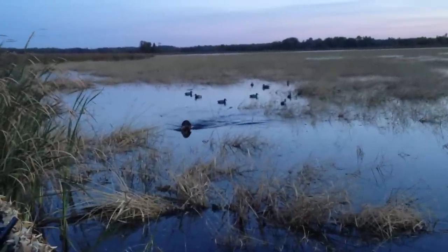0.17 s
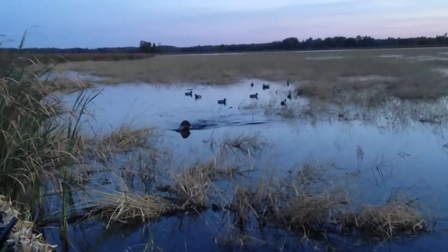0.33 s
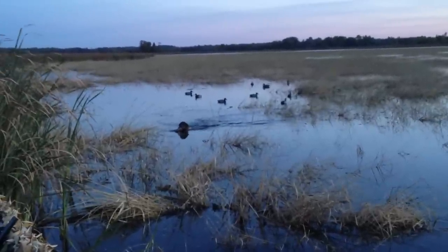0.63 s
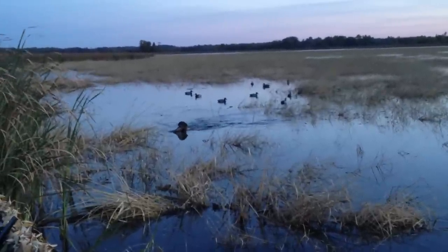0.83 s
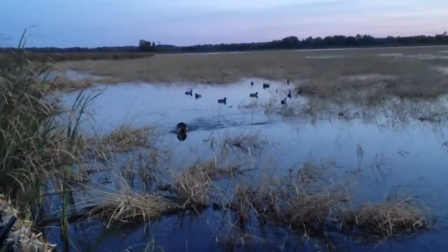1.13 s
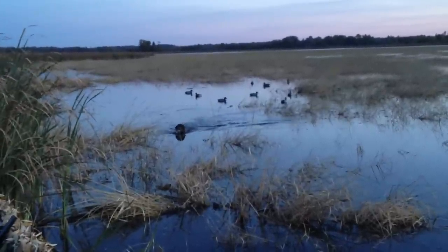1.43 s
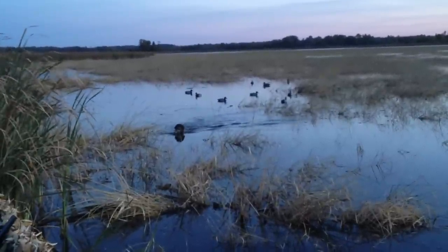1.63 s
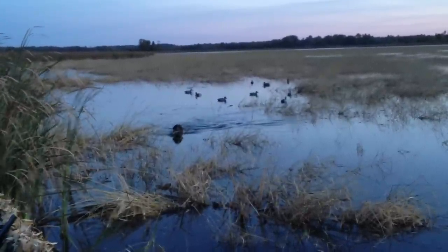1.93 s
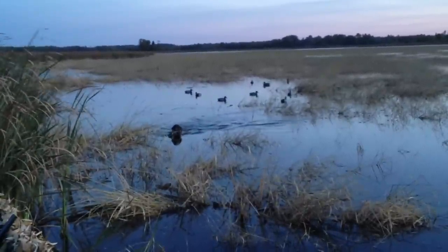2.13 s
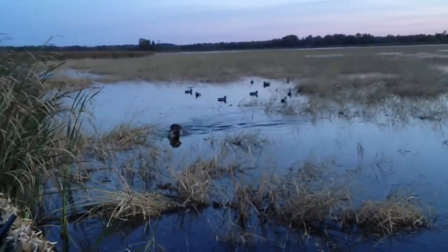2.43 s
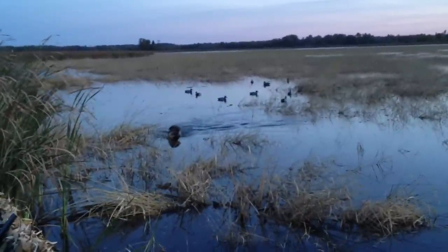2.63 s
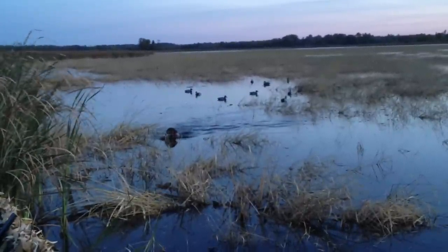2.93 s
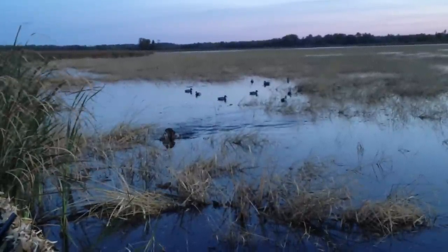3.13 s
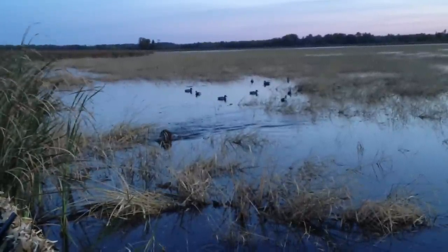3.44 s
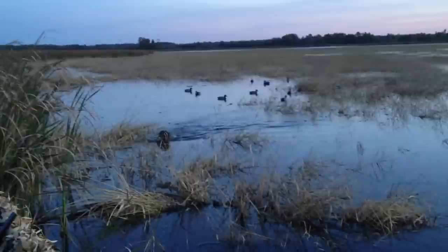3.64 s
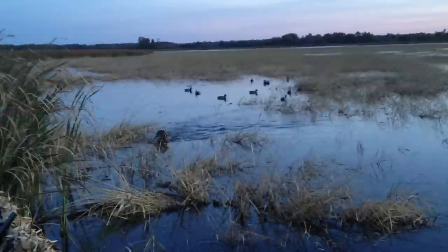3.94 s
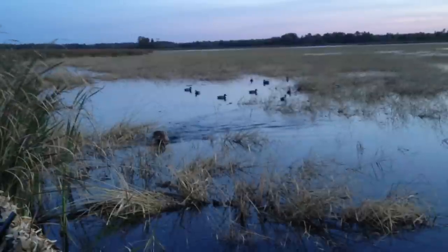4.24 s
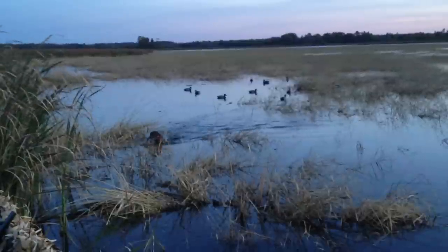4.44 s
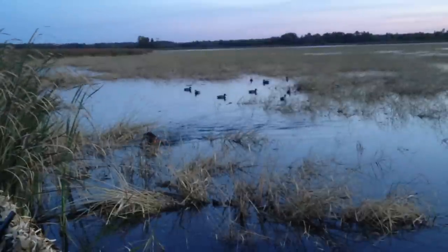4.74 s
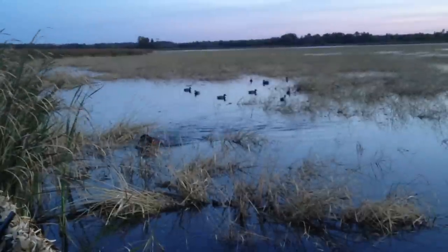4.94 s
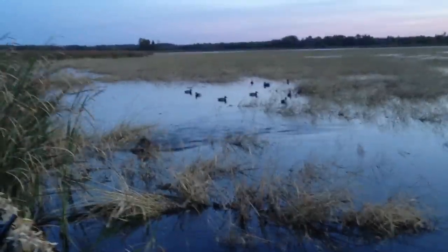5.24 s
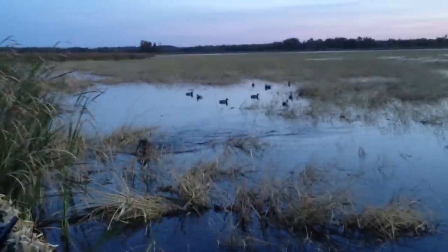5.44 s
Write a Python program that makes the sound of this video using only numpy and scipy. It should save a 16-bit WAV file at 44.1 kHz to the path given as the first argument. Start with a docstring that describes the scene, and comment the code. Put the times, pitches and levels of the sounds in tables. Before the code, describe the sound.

A dog paddles through shallow marsh water with soft, irregular splashes and dry reed snaps, while wind gusts thump on the microphone.

```python
"""Dog paddling through a marsh at dusk

A dog's strokes wash, splash and plop softly in shallow water: fizzing spray and ringing air pockets.
Close by, dry reed stalks snap and hiss; faint, very high pips may be an insect or a distant bird.
Puffs of wind rumble and thump on the microphone, over the faint hiss of the open marsh."""
import sys
import numpy as np
from scipy import signal
from scipy.fft import rfft, irfft
from scipy.io import wavfile
from scipy.ndimage import uniform_filter1d, map_coordinates

SR = 44100
rng = np.random.default_rng(int(sys.argv[2]) if len(sys.argv) > 2 else 0)


def dump(signal):
    """Clip the signal to [-1, 1] and save it as 16-bit WAV at the path in sys.argv[1]."""
    limited = np.clip(np.atleast_2d(signal).T, -1, 1)
    pcm = np.round(limited * 32767).astype(np.int16)
    wavfile.write(sys.argv[1], SR, pcm)


N = 246078
TIME = np.arange(N) / SR


# How hard the dog stirs the water, the fader ride of the wash: (time [s], level [dB])
STIR = [(0.0, -58.5), (0.53, -55), (0.7, -59.5), (0.88, -63), (1.12, -58), (1.26, -55.5), (1.51, -54.5),
        (1.71, -61.5), (1.93, -54.5), (2.11, -53), (2.19, -48.5), (2.35, -56.5), (3.08, -60.5), (3.31, -59),
        (4.4, -59.5), (5.17, -55.5), (5.58, -48.5)]
# EQ of the water's fizz: (frequency [Hz], gain [dB])
WASH_EQ = [(440, -35), (750, -4), (1000, -6), (1140, 0), (1470, -1), (1580, 2), (3260, 0), (3520, 2),
           (5280, -1), (7530, 3.5), (9820, -2), (14200, -1.5), (15500, -9)]

def wash(body_db=-9.5, spray_db=-4.0, drops_db=-12.5, split_hz=4000, body_follows=0.7):
    """Stirred water: a fizzing body with small bubbles, and finer spray that ticks on the stalks."""
    stir_db = np.interp(TIME, *np.transpose(STIR))
    spray_ride = from_db(stir_db)
    body_ride = from_db(stir_db.mean() + body_follows * (stir_db - stir_db.mean()))
    fizz = coloured(rng.standard_normal(N), WASH_EQ)
    low = rms_one(cut(fizz, split_hz, "low")) * from_db(body_db + 1.2 * drift(70))
    high = rms_one(cut(fizz, split_hz, "high")) * from_db(spray_db + .7 * drift(70))
    bubbles, ticks = np.zeros((2, N))
    for when, pitch, softness in rng.random((700, 3)):
        ring = bubble(900 * 6 ** pitch, cycles=10, rise=.015)
        add(bubbles, when * N / SR, from_db(-16 * softness) * ring)
    for when, pitch, softness in rng.random((900, 3)):
        tick = bubble(3000 * 4 ** pitch, cycles=1.5, rise=0)
        add(ticks, when * N / SR, from_db(-18 * softness) * tick)
    body = low + from_db(drops_db) * rms_one(bubbles)
    spray = .22 * rms_one(ticks) - high
    return body_ride * body + spray_ride * spray


def laps(per_s=9, over_stir_db=12.5, spread_db=0.5, centre_hz=3000, octaves=2.6, length_s=0.02):
    """Cues for small random splashes, stronger where the water is stirred more; rows as in SPLASHES."""
    wait, softness, pitch = rng.random((70, 3)).T
    times = np.cumsum(2 * wait) / per_s
    db = np.interp(times, *np.transpose(STIR)) + over_stir_db - spread_db * (2 * softness - 1)
    hz = centre_hz * 2 ** (2 * pitch - 1)
    return [(*cue, octaves, length_s) for cue in zip(times, db, hz)]


# Featured splashes and swishes: (time [s], relative level [dB], centre [Hz], width [octaves], length [s])
SPLASHES = [(0.153, -41, 2230, 2, 0.024), (0.263, -37, 7440, 5.3, 0.027), (0.3114, -33, 5250, 2.2, 0.013),
            (0.658, -32.5, 4300, 1.9, 0.021), (1.078, -41, 5020, 5.5, 0.1), (1.177, -43, 5800, 2.8, 0.059),
            (1.197, -30.5, 3260, 3.2, 0.025), (1.336, -39, 3380, 1.2, 0.049),
            (1.496, -36.5, 3180, 3.2, .075), (1.9626, -39, 1190, 4.2, 0.066),
            (2.009, -35.5, 4850, 1.7, 0.097), (2.191, -36.5, 1945, 4.7, 0.062),
            (2.327, -38, 1499, 5.7, .046), (2.5735, -38, 3500, 3.1, 0.099), (2.921, -43, 1600, 3.76, 0.016),
            (3.15, -38, 3300, 1.6, 0.028), (3.262, -44, 2447, 2.8, 0.019), (3.373, -34, 6540, 3.7, 0.018),
            (3.772, -43.5, 3000, 3.7, 0.14), (4.402, -40, 4260, 3.5, 0.029),
            (4.454, -37.5, 4500, 4.4, 0.062), (4.633, -32.5, 3620, 2.6, 0.034),
            (4.687, -38, 3712, 2.93, 0.05), (5.4016, -30.5, 3200, 12.7, 0.04),
            (5.441, -28, 5810, 2.5, 0.048), (5.48, -29, 7970, 5.2, 0.03), (5.573, -34.5, 3700, 5.3, 0.1)]

def splashes(level_db=-13.0, attack_s=0.0035, attack_share=0.093, drops_db=-9.0, size=9000):
    """Quick showers that swell and die: brushing stalks and short-lived bubbles of kindred size."""
    out, t = np.zeros(N), TIME[:size]
    for s, db, hz, octaves, length in list(SPLASHES) + laps():
        attack = 1 - np.exp(-t / (attack_s + attack_share * length))
        swell = attack * np.exp(-2 * t / length)
        drops = np.zeros(size)
        for when, pitch in rng.random((40, 2)):
            drop_hz = np.clip(hz * 2 ** (1.6 * pitch - 1), 700, 9000)
            add(drops, when * size / SR, bubble(drop_hz, cycles=7, rise=.02))
        brush = rms_one(band(crackle(size, spread_db=7.0), hz, octaves))
        shower = brush + from_db(drops_db) * rms_one(drops)
        add(out, s - .002, from_db(db + level_db) * shower * swell / swell.max())
    return cut(out, 520, "high")


# Larger air pockets closing in the water: (time [s], level [dB], pitch [Hz])
PLOPS = [(0.164, -41.5, 2130), (0.324, -52, 714), (0.905, -48.5, 970), (2.047, -44.5, 1193),
         (3.264, -45.5, 2370), (3.73, -51.5, 1660), (4.905, -44.5, 2137)]

def plops():
    """Single larger bubbles left by the paws."""
    out = np.zeros(N)
    for s, db, hz in PLOPS:
        add(out, s, from_db(db) * bubble(hz, cycles=10.5, rise=0.036))
    return out


def bubble(hz, cycles, rise):
    """An air pocket rings and climbs in pitch as it nears the surface."""
    age = TIME[:int(6 * SR * cycles / hz)] * hz / cycles   # in decay times
    envelope = (1 - np.exp(-8 * age)) * np.exp(-age)
    return envelope * np.sin(2 * np.pi * cycles * (age + rise * age ** 2 / 2))


# Dry reed snaps: (time [s], relative level [dB], centre [Hz], width [octaves], tail over crack [dB])
REED_SNAPS = [(0.453, -46.5, 6100, 7.5, 21), (0.7432, -40, 9000, 3.2, 25), (0.853, -43.5, 7300, 6.7, 11),
              (0.878, -47, 6200, 1.9, 14), (1.3805, -34, 5050, 2.5, -1), (1.401, -38.5, 2560, 0.58, -6),
              (1.6075, -34, 3860, 2.4, -4.5), (1.7443, -38.5, 4576, 1.1, -6), (2.079, -36.5, 3974, 0.71, 4),
              (2.589, -43, 2450, .61, 4), (3.156, -43.5, 3503, 0.31, -4), (3.508, -43, 3339, 2.3, -0.5),
              (4.1866, -29, 5230, 0.66, -6.5), (4.188, -39, 2040, 0.43, 1), (4.2829, -40, 2756, 0.46, -12),
              (4.417, -42, 4690, 0.85, 5), (4.443, -42, 6544, 1.6, 1), (4.500, -46, 4755, 0.43, 2),
              (4.516, -43, 4670, 0.48, -19), (4.904, -48, 2330, 1.52, 1), (5.3998, -37, 8560, 0.41, 3)]

def reed_snaps(level_db=0.5, fibres=0.34, tail_s=0.0077, echo_s=0.0064, echo_db=-9.0, size=3500):
    """A stalk cracks and its last fibres part; the ground slaps it back and the reeds scatter it."""
    out, t = np.zeros(N), TIME[:size]
    for s, db, hz, octaves, tail_db in REED_SNAPS:
        tear = fibres * rng.standard_normal(size) * np.exp(-t / .0005)
        crack = band((t == 0) + tear, hz, octaves)
        echo = from_db(echo_db) * np.roll(crack, int(echo_s * SR))
        decay = np.exp(-t / tail_s) + 0.16 * np.exp(-t / 0.026)
        tail = band(rng.standard_normal(size) * decay, hz, octaves)
        scatter = from_db(tail_db) * tail * np.linalg.norm(crack) / np.linalg.norm(tail)
        add(out, s, from_db(db + level_db) * peak_one(crack + echo + scatter))
    return cut(out, 380, "high")


# Three faint, very high pips, then three lower, narrow reed hisses:
# (crest time [s], level [dB], centre [Hz], width [octaves], fade [s])
PIPS_AND_HISSES = [(1.089, -56.5, 11200, .04, .03), (2.114, -56, 11000, .05, 0.015),
                   (3.63, -64, 11080, 0.043, 0.014), (4.731, -59, 5060, 0.33, 0.045),
                   (4.967, -57.5, 4735, 0.29, 0.037), (5.21, -54.5, 7360, 0.46, 0.088)]

def pips_and_hisses(size=16000):
    """Narrow noise fading in and out: thin pips, perhaps an insect or distant bird, and reed hisses."""
    out, half_s = np.zeros(N), size / SR / 2
    for s, db, hz, octaves, fade_s in PIPS_AND_HISSES:
        narrow = rms_one(band(rng.standard_normal(size), hz, octaves, order=2))
        swell = np.exp(-2 * ((TIME[:size] - half_s) / fade_s) ** 2)
        add(out, s - half_s, from_db(db) * narrow * swell)
    return out


# Puffs of wind at the microphone: (crest time [s], level [dB], release [s])
GUSTS = [(0.075, -51.5, 0.14), (0.28, -47, 0.043), (0.455, -29, 0.048), (0.579, -42.5, .11),
         (0.719, -55, 0.059), (0.86, -55, 0.091), (1.0, -55.5, 0.092), (1.84, -45.5, 0.033),
         (1.92, -45, 0.037), (2.001, -36.5, 0.081), (2.088, -26, 0.093), (2.362, -25, 0.067),
         (2.44, -38, .15), (2.722, -39, 0.087), (2.834, -38, .045), (2.985, -50.5, 0.052),
         (3.165, -33.5, 0.072), (3.24, -29, 0.086), (3.705, -43, .06), (3.825, -35.5, .065),
         (3.979, -48, .12), (4.481, -41, 0.055), (4.608, -30, 0.059), (4.68, -39, 0.1),
         (4.998, -24.5, 0.047), (5.085, -30.5, 0.1), (5.202, -24, .055), (5.28, -49, .1),
         (5.41, -45.5, .11), (5.57, -32.5, .1)]

def gust_envelope_db(fall_db=20.5, attack_share=.9):
    """Each puff rises to its crest, then drops by fall_db per release time; their powers add."""
    power = 1e-12
    for s, db, release_s in GUSTS:
        from_crest = np.maximum((s - TIME) / attack_share, TIME - s) / release_s
        power = power + from_db(db - fall_db * np.minimum(from_crest, 10)) ** 2
    return 10 * np.log10(power)


# EQ of the rumble at its usual strength: (frequency [Hz], gain [dB])
RUMBLE_EQ = [(25, -75), (60, -34), (100, -11), (140, 1), (220, 1.5), (300, -8.5), (450, -21.5),
             (700, -35.5), (1200, -92), (2000, -120)]

def wind_rumble(trim_db=-4.0, flutter_db=4.0, octaves_per_db=.007, usual_db=-32.5):
    """Turbulence on the microphone port: stronger puffs carry it past faster, so it sounds higher."""
    level_db = gust_envelope_db() + trim_db + flutter_db * drift(80)
    speed = 2 ** (octaves_per_db * (level_db - usual_db))
    turbulence = coloured(rng.standard_normal(N), RUMBLE_EQ)
    levelled = turbulence / np.sqrt(uniform_filter1d(turbulence ** 2, size=600) + 0.047)
    varispeed = map_coordinates(levelled, [np.cumsum(speed) % (N - 1)], order=3)
    return from_db(level_db) * rumble_ducking() * varispeed


# Big eddies that land as separate thumps: (time [s], relative level [dB], nominal pitch [Hz])
BUFFETS = [(0.033, -42, 139), (0.232, -40, 132), (0.423, -30, 206), (0.462, -23, 202), (0.518, -39, 182),
           (0.582, -30.5, 164), (0.619, -39.5, 180), (1.048, -48, 144), (1.962, -28, 163),
           (2.013, -24, 196.1), (2.071, -24.5, 238), (2.137, -27, 191), (2.343, -29, 217),
           (2.362, -21, 223), (2.43, -26.5, 170), (2.464, -28.5, 216.2), (2.627, -34.5, 205),
           (2.706, -33, 287.9), (2.818, -31.5, 179), (3.199, -26.5, 219.8), (3.238, -26, 220.1),
           (3.252, -31.5, 311.2), (3.815, -29.5, 194), (3.833, -31.5, 239.4), (3.965, -37.5, 190),
           (4.442, -38, 164.1), (4.497, -34.5, 177.3), (4.674, -28.5, 152), (4.973, -28.5, 208),
           (5.006, -21, 195.2), (5.063, -27.5, 212.3), (5.164, -23, 200.2), (5.208, -19.5, 223.3),
           (5.229, -27, 204), (5.511, -33, 177.7)]
BUFFET_HALF_S = .0065   # a big eddy fills the port for about this long either side of its middle

def wind_buffets(level_db=-1.0, width_s=0.001, bass_cut_hz=152, size=2200):
    """An eddy is a push and a weaker pull, shorter when higher; the microphone's bass cut rings with it."""
    out, t = np.zeros(N), TIME[:size] - .012
    shapes = rng.random((500, 3))
    for (s, db, hz), (gap, suction, polarity) in zip(list(BUFFETS) + small_eddies(), shapes):
        width = width_s * (200 / hz) ** 1.6
        push = 1 / np.cosh(t / width)
        pull = 0.48 * suction / np.cosh((t - .002 - 0.00303 * gap) / width)
        thump = peak_one(cut(push - pull, bass_cut_hz, "high", order=4), size=350)
        middle_s = np.average(TIME[:size], weights=thump ** 2)
        add(out, s - middle_s, from_db(db + level_db) * np.sign(polarity - .5) * thump)
    return out


def small_eddies(per_s=31, under_gust_db=4.0, spread_db=2.5, usual_hz=205, usual_db=-30.5):
    """Cues for small, uneven thumps between the big ones, riding the gusts; rows as in BUFFETS."""
    wait, strength, pitch = rng.random((400, 3)).T
    times = np.cumsum(.5 + wait) / per_s
    db = np.interp(times, TIME, gust_envelope_db()) - under_gust_db + spread_db * (2 * strength - 1)
    octaves = 0.17 * (db - usual_db) + 0.16 * (2 * pitch - 1)   # harder eddies sound higher
    to_buffet_s = np.abs(times[:, None] - np.array(BUFFETS)[:, 0]).min(axis=1)
    clear = (to_buffet_s > 2 * BUFFET_HALF_S) & (times < TIME[-1])
    return list(np.transpose([times, db, usual_hz * 2 ** octaves])[clear])


def rumble_ducking():
    """Each big eddy sweeps the small turbulence off the port, ducking its gain from 1.5 to 0.5."""
    dips = [np.exp(-((TIME - s) / BUFFET_HALF_S) ** 2) for s, _, _ in BUFFETS]
    return 1.5 - np.max(dips, axis=0)


def microphone_port(pressure, lopsided=2.65, peaky=13.0, muffle_hz=720):
    """Hard puffs overdrive the narrow port unevenly, sharpening their crests; it rounds off the spit."""
    distortion = cut(lopsided * pressure ** 2 + peaky * pressure ** 3, 350, "high")
    return cut(pressure + distortion, muffle_hz, "low", order=3)


# EQ of the ambience bed: (frequency [Hz], gain [dB])
AIR_EQ = [(30, -32), (70, -20), (130, -6), (260, 0), (550, -3), (1000, -9), (4000, -13), (15500, -18)]

def marsh_air(level_db=-63):
    """The faint, steady hiss of the open marsh."""
    return from_db(level_db) * coloured(rng.standard_normal(N), AIR_EQ)


def from_db(db):
    """Decibels to gain."""
    return 10 ** (np.asarray(db) / 20)


def rms_one(x):
    """Scale to unit power."""
    return x / np.sqrt(np.mean(x ** 2) + 1e-20)


def peak_one(x, size=132):
    """Scale so that the loudest stretch of size samples has unit power."""
    return x / np.sqrt(uniform_filter1d(x ** 2, size).max() + 1e-20)


def add(out, s, sound):
    """Mix a sound in at time s."""
    at = int(np.clip(round(s * SR), 0, len(out) - 1))
    out[at:at + len(sound)] += sound[:len(out) - at]


def coloured(x, eq):
    """Shape a steady signal with an EQ curve; rms 1."""
    hz, db = np.transpose(eq)
    bins = np.maximum(np.fft.rfftfreq(N, 1 / SR), 1)
    gain = from_db(np.interp(np.log(bins), np.log(hz), db))
    return rms_one(irfft(rfft(x) * gain, N))


def band(x, hz, octaves, order=1):
    """Band-pass, at most five octaves wide; its skirts steepen with the order."""
    half = 2 ** (np.clip(octaves, .03, 5) / 2)
    high = min(hz * half, .45 * SR)
    low = min(hz / half, high / 1.05)
    return cut(x, [low, high], "band", order)


def cut(x, hz, kind, order=2):
    """High-, low- or band-pass filter."""
    return signal.sosfilt(signal.butter(order, hz, kind, fs=SR, output="sos"), x)


def drift(rate):
    """Random modulation with about rate turns a second."""
    knots = rng.standard_normal(4096)
    return np.interp(TIME * rate, np.arange(len(knots)), knots)


def crackle(size, spread_db):
    """Countless tiny impacts of very unequal strength; rms 1."""
    noise = rng.standard_normal(size)
    return rms_one(noise * from_db(spread_db * np.clip(rng.standard_normal(size), -2, 2)))


def scene(dull_hz=13000):
    """Mono mix: water, reeds and faint pips in the open, with wind on the microphone."""
    air = marsh_air()
    near = cut(splashes() + reed_snaps(), dull_hz, "low")   # the reeds soak up the highest treble
    marsh = wash() + near + pips_and_hisses() + plops()
    wind = microphone_port(wind_rumble() + wind_buffets())
    return (marsh + wind + air)[None]


def record(dry, cutoff_hz=15400):
    """A steep low-pass takes the very top off the mix."""
    return signal.sosfilt(signal.ellip(12, .2, 80, cutoff_hz, fs=SR, output="sos"), dry)


dry = scene()
out = record(dry)
dump(out)
```